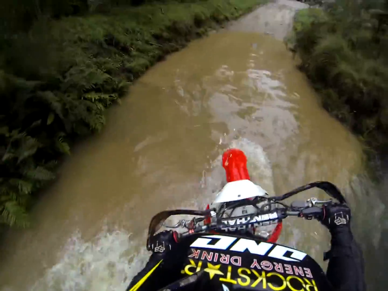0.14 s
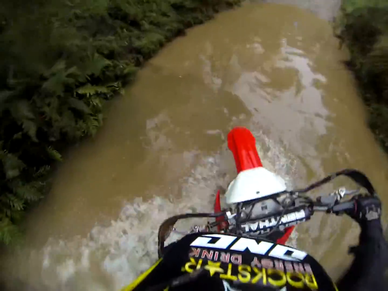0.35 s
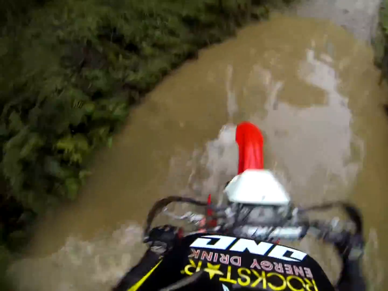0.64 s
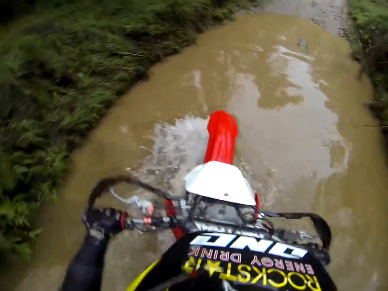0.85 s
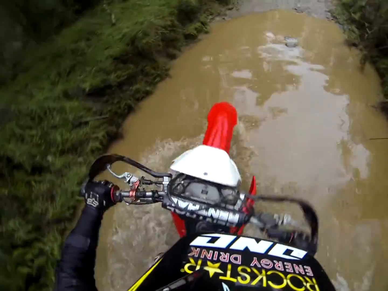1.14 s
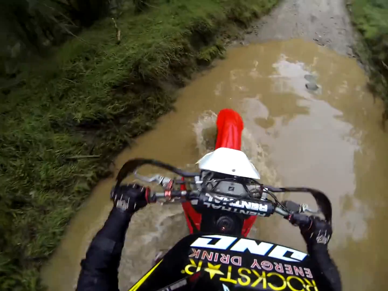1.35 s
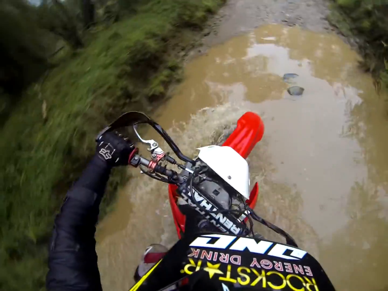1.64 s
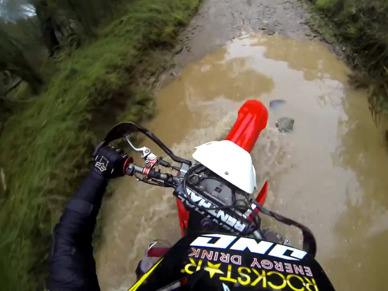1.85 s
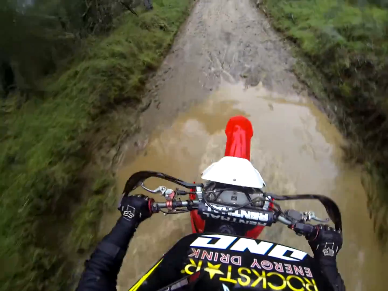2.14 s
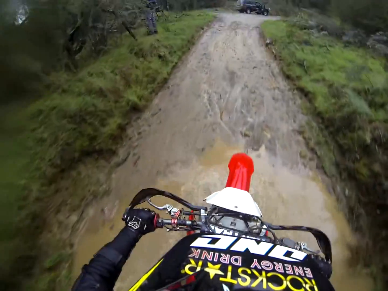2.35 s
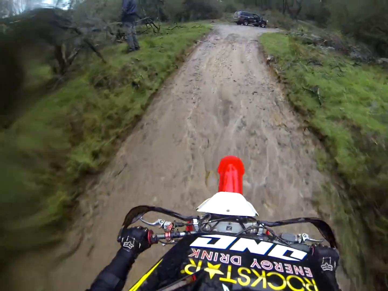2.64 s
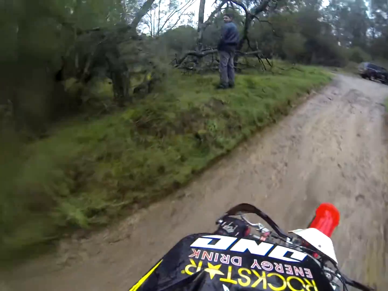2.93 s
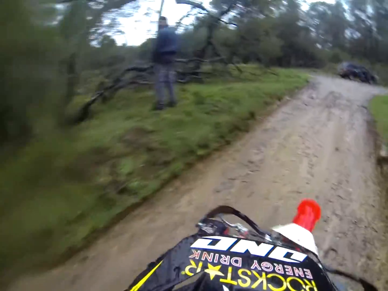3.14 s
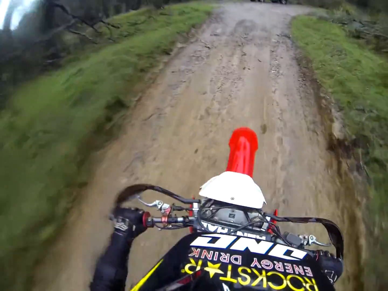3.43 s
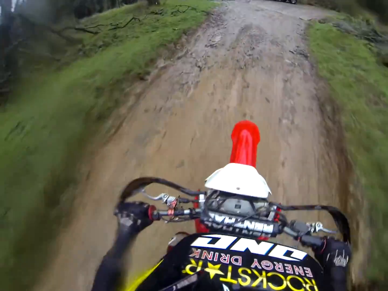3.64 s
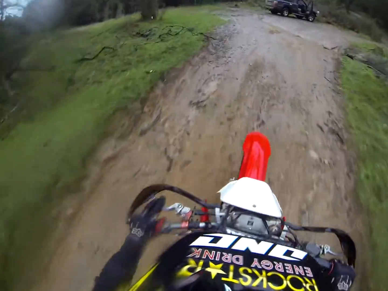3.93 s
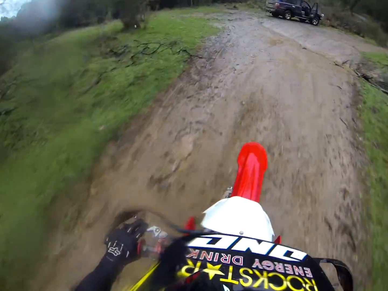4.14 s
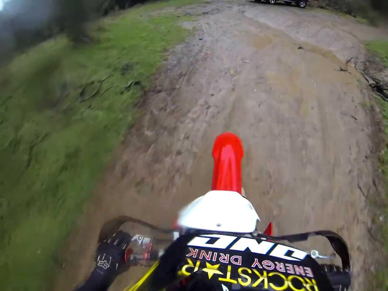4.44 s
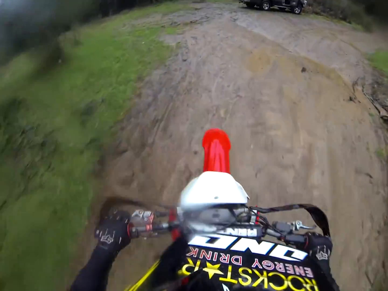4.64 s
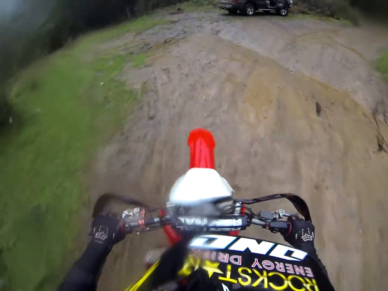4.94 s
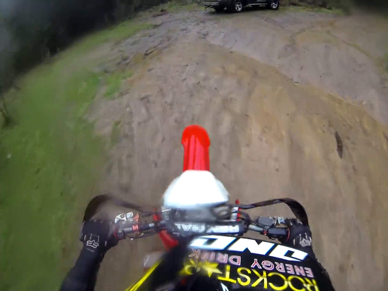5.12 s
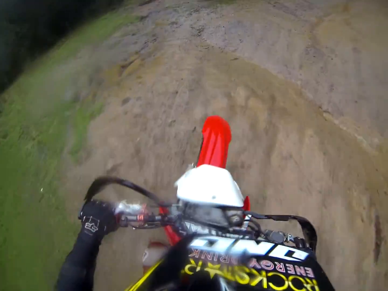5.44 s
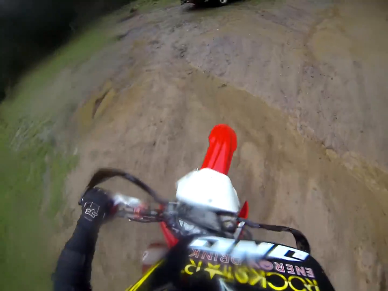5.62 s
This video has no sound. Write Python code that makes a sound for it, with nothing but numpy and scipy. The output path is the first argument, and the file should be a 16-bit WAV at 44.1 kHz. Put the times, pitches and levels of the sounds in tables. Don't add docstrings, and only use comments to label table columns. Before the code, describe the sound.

A mono, boxy, close action-camera sound: low mount flutter and wind buffeting under a buzzing dirt bike engine. It surges through splashing water, swelling and revving highest while climbing out, then drops with a big thud. On the open track it drones moderately, the throttle shuts, blips once with a hard hollow knock, and fades into slow, uneven, misfiring pulses with scattered grit clicks.

```python
import sys
import numpy as np
from scipy import signal
from scipy.fft import rfft, irfft
from scipy.io import wavfile
from scipy.ndimage import uniform_filter1d

SR = 44100
rng = np.random.default_rng(int(sys.argv[2]) if len(sys.argv) > 2 else 0)


def store_wav(level_fs):
    pcm = np.round(np.clip(np.atleast_2d(level_fs), -1, 1) * 32767)
    wavfile.write(sys.argv[1], SR, pcm.T.astype(np.int16))


def nominal_scale(level):
    x = np.asarray(level, float) / 20
    return 10 ** x


N = 254898

# time in seconds, level in dB.
LOUDNESS = [(0, -42), (.42, -37), (.55, -43), (.8, -39.5), (1.07, -30), (1.6, -35), (1.9, -29.5),
            (2.38, -23.5), (2.66, -31), (2.8, -38.5), (3.02, -35), (3.55, -34.5), (3.85, -42.5),
            (4.28, -47.5), (4.42, -39.5), (4.74, -43.5), (4.88, -46.5), (5.78, -52.5)]
# pitch in Hz, width in Hz, level in dB.
CAVITY = [(1366, 122, -7), (1567, 123, -2.5), (1630, 160, -5)]


def bike():
    # time in seconds, share from 0 to 1.
    water = [
        (0, 0.75),
        (.9, 0.9),
        (2.3, 0.72),
        (2.7, 0.48),
        (3.6, 0.34),
        (4.0, 0),
        (5.78, 0.05),
    ]
    # time in seconds, uneven burning from 0 to 1, share of missed firings from 0 to 1.
    roughness = [(0, .25, 0), (.85, .1, 0), (2.3, .06, 0), (2.65, .1, 0), (2.75, .12, 0), (3.0, .05, 0),
                 (3.6, .06, 0), (3.8, .18, .08), (4.3, .2, .1), (4.55, .1, 0), (4.75, .1, 0),
                 (4.85, .2, .12), (5.3, .12, .3), (5.78, .1, .4)]
    hz, loudness_db, flare_db, shut = controls()
    wet = np.clip(in_time(water)[0], 0, 1)
    rough, missed = in_time(roughness)
    cycle = np.cumsum(hz) / SR + 0.07 * rough * drift(25.0)
    blow_down = np.exp(-3.0 * (cycle % 1))
    valve_train = 0.6 * np.exp(-5.0 * ((cycle + 0.5) % 1))
    gate = blow_down + valve_train
    hum = crank_hum(hz, cycle, loudness_db, wet, shut)
    note = exhaust_note(hz, cycle, gate, rough, missed, loudness_db, flare_db, wet, shut)
    return hum + note + ringing_case(cycle, gate, loudness_db, wet) + whine(loudness_db)


def controls():
    # time in seconds, firings per second.
    speed = [(0, 47.5), (.39, 56.5), (.85, 60.8), (1.09, 64.5), (1.45, 61), (1.72, 67), (2.0, 67.4),
             (2.5, 80.1), (2.62, 77.5), (2.72, 62), (2.92, 51.5), (3.17, 58.7), (3.55, 61.8), (3.8, 48.3),
             (4.2, 43), (4.73, 46), (4.92, 38), (5.78, 28)]
    # time in seconds, extra firings per second, extra exhaust in dB.
    flares = [(.13, 0, 12.5), (1.0, 5.5, 5.5), (1.21, 7.5, -1), (1.42, 0, 2), (1.54, 0, 1),
              (1.68, 0.5, -5.5), (2.06, 0, -6.5), (2.27, -1.75, -12), (2.4, 1, -7), (3.02, -1, 4),
              (3.5, 0, -2.5), (3.87, 0, 3.5), (4.12, 0.5, 4.), (4.34, 0, 3.5), (4.43, 8.5, -3.),
              (4.7, 0, 5.5), (4.87, 0, -7), (5.05, 0, 3.5), (5.42, -0.5, -5.5)]
    # opens in seconds, shuts in seconds.
    throttle_open = [
        (-.1, 3.51),
        (4.3, 4.63),
    ]
    opening_s, shutting_s = 0.022, 0.14
    flare_hz, flare_db = swells(flares)
    opens, shuts = np.array(throttle_open).T[:, :, None]
    t = np.arange(N) / SR
    opened = np.minimum((t - opens) / opening_s, 1 - (t - shuts) / shutting_s)
    shut = 1 - np.clip(opened, 0, 1).max(axis=0)
    return in_time(speed)[0] + flare_hz, in_time(LOUDNESS)[0], flare_db, shut


def crank_hum(hz, cycle, loudness_db, wet, shut):
    # time in seconds, level in dB.
    shake = [(0, -31.5), (.25, -30), (.8, -32), (1.0, -17.5), (1.1, -18.5), (1.38, -24.5), (1.52, -24.5),
             (1.95, -27.5), (2.25, -33), (2.42, -26), (2.62, -31.5), (2.9, -38), (3.17, -30), (3.45, -42),
             (3.68, -32.5), (4.2, -46.5), (4.46, -30), (4.7, -41.5)]
    # pitch in Hz, gain in dB.
    frame = [(85, -2.5), (105, 4.), (125, -0.5), (143, -5), (167, 0), (200, 2.5), (222, 5.5), (240, 16.5)]
    above_db = loudness_db + 40
    first_db = -38.0 + 0.73 * above_db - 10.5 * wet - 14 * shut
    first = nominal_scale(first_db) * np.sin(2 * np.pi * cycle)
    second_db = in_time(shake)[0] + 1.0 * drift(1.4)
    second = nominal_scale(second_db) * np.sin(4 * np.pi * cycle)
    frame_hz, frame_db = np.transpose(frame)
    third_db = -48 + 13 * shut + 0.48 * above_db
    third_db = third_db + np.interp(3 * hz, frame_hz, frame_db)
    third = nominal_scale(third_db - 1.5 + 1.0 * drift(9.7)) * np.sin(6 * np.pi * cycle)
    return np.sqrt(2) * (first + second + third)


def exhaust_note(hz, cycle, gate, rough, missed, loudness_db, flare_db, wet, shut):
    # pitch in Hz, width in Hz, level in dB.
    pipe_modes = [(66, 25, -2), (118, 51, 3.5), (232.2, 28.8, 5.5), (323.4, 27.9, -1)]
    # pitch in Hz, width in Hz, level in dB.
    bark_modes = [(470, 98, -4), (558, 53, -3.5), (699, 55, -6.5), (977, 55, -11.5)]
    # time in seconds, pitch in Hz, boost in dB.
    favoured_pitch = [(0, 477, -1), (.4, 413, 16), (1.1, 486, -4.5), (1.45, 420, 12), (1.55, 694, 8.),
                      (1.7, 730, 10), (1.8, 540, 1), (2.19, 420, 5), (2.45, 520, 8.5), (3.1, 474, 6),
                      (3.57, 533, 9), (5.78, 470, 1)]
    favoured = in_time(favoured_pitch)
    pipe_db = loudness_db + 9.5 - 15.0 * wet + flare_db
    bark_db = loudness_db - 1.5 - 3.5 * wet + 0.31 * flare_db
    bark_db = bark_db + shut * (-8.5 + 20 * np.log2(hz / 48))

    chance = np.c_[rng.standard_normal(400), rng.random(400)][cycle.astype(int)]
    strength = nominal_scale(8.0 * rough * chance[:, 0] - 13.0 * (chance[:, 1] < missed))
    strength = cut(strength, 300, "low", order=2)
    gas = rms_one(gate * rng.standard_normal(N))

    low_lines = orders(hz, cycle, pipe_modes, *favoured, multiples=range(4, 14))
    pipe = gas_and_lines(low_lines, gas, strength, rough, pipe_modes, [170, 380])
    high_lines = orders(hz, cycle, bark_modes, *favoured, multiples=range(4, 25))
    bark = gas_and_lines(high_lines, gas, strength, rough, bark_modes, [400, 900])
    return nominal_scale(pipe_db - 2.0) * pipe + nominal_scale(bark_db + 1.0) * cut(bark, 177, "high", order=2)


def orders(hz, cycle, modes, loudest_hz, boost_db, multiples):
    grid = np.arange(1, 2001.0)
    response = np.zeros(len(grid), complex)
    for k, (top_hz, width_hz, db) in enumerate(modes):
        response += (-1) ** k * nominal_scale(db) / (1 + 2j * (grid - top_hz) / width_hz)
    out = np.zeros(N)
    for k in multiples:
        colour = response[np.minimum(k * hz, len(grid) - 1).astype(int)]
        favoured_db = boost_db * np.exp(-((k * hz - loudest_hz) / 45) ** 2)
        line = np.real(colour * np.exp(2j * np.pi * k * cycle))
        out += nominal_scale(favoured_db + 3.3 * drift(2.5)) * line
    return rms_one(out)


def gas_and_lines(lines, gas, strength, rough, modes, band_hz):
    note = strength * (lines + 1.6 * rough * rms_one(resonate(gas, modes)))
    inside = cut(note, band_hz, "band", order=3)
    return note / np.sqrt(uniform_filter1d(inside ** 2, size=SR // 8))


def ringing_case(cycle, gate, loudness_db, wet):
    # pitch in Hz, width in Hz, level in dB.
    shell_modes = [(2079, 69, 8), (2475, 192, 2), (3000, 490, 0.5), (3574, 277, 1.5), (3842, 180, 2.5)]
    # pitch in Hz, width in Hz, level in dB.
    top_modes = [(4845, 790, 15.5), (5350, 280, -6.5), (7100, 470, 1), (9000, 9600, -29), (11200, 7200, -1),
                 (14000, 310, -32)]
    # time in seconds, change in dB.
    slaps = [(.06, 0), (.73, 0), (1.2, -0.5), (1.31, 1.5), (1.54, 4.5), (1.99, 1), (2.19, 1.5), (2.28, 3.5),
             (2.49, 1.5), (2.67, 2), (3.85, -1.5), (4.13, 2.5), (4.6, -2)]
    cavity_db = -33.0 + 0.75 * (loudness_db + 40) + swells(slaps)[0]
    taps = rms_one(np.diff(np.floor(cycle), prepend=0))
    clatter = rms_one((0.5 + gate) * rng.standard_normal(N))
    metal = rms_one(0.12 * taps + clatter)
    hiss = np.sqrt(1 - wet) * metal + np.sqrt(wet) * spray(per_s=4000.0)
    hiss = nominal_scale(0.5 * drift(4.8)) * hiss

    cavity = resonate(resonate(hiss, CAVITY, wander_db=1.5), [(1492, 780, 0.0)])
    cavity = evened(cavity, window_s=0.13)
    shell = cut(resonate(hiss, shell_modes, wander_db=1.5), [1500, 4300], "band", order=3)
    shell = evened(shell, window_s=0.1)
    top = cut(resonate(hiss, top_modes), 2200, "high", order=2)
    top = evened(cut(top, 7000, "low", order=2), window_s=0.17)
    return nominal_scale(cavity_db) * cavity + nominal_scale(loudness_db) * (shell + nominal_scale(-13.0) * top)


def spray(per_s):
    sizes = nominal_scale(5.4 * np.minimum(rng.exponential(1, N), 5)) * rng.choice([-1, 1], N)
    drops = sizes * (rng.random(N) < per_s * nominal_scale(4.0 * drift(15.0)) / SR)
    return rms_one(rms_one(drops) + 1.8 * rng.standard_normal(N))


def whine(loudness_db):
    # time in seconds, pitch in Hz, dB against the loudness.
    gear_mesh = [(0, 7500, -19), (.42, 7420, -11.5), (.75, 7450, -19), (1.03, 7390, -28), (1.37, 7800, -20),
                 (1.75, 7350, -26), (2.64, 7370, -19.5), (3.5, 7410, -15.5), (3.75, 7420, -32)]
    hz, against_db = in_time(gear_mesh)
    level_db = loudness_db + against_db
    wobble = cut(rng.standard_normal((2, N)), 210, "low", order=2)
    turn = 2 * np.pi * np.cumsum(hz) / SR
    teeth = rms_one(wobble[0] * np.cos(turn) + wobble[1] * np.sin(turn))
    mesh = nominal_scale(level_db - 5.5 + 2.0 * drift(30.0)) * teeth
    thin_mode = [(10250, 300, 0)]
    thin = resonate(resonate(rng.standard_normal(N), thin_mode), thin_mode)
    return mesh + nominal_scale(-84) * rms_one(thin)


def grit():
    # time in seconds, peak in dB, lower ring in dB
    ticks = [(0.1281, -48, -1), (0.4958, -51, -2), (0.7317, -55, 1), (1.4287, -51, 8), (2.9996, -47, 3),
             (3.2999, -52, 10), (3.3348, -48, 4), (3.4825, -49, 6), (3.491, -44, 2), (3.5528, -52, 10),
             (3.5728, -49, 3), (3.6117, -49, 1), (3.7324, -51, 2), (3.9165, -52, 1), (4.1719, -57, 2),
             (4.2557, -56, -2), (4.3141, -47, -6), (4.373, -54, 5), (4.6049, -54, 2), (4.6897, -52, 1),
             (4.7456, -55, 2), (4.8564, -47, 5), (4.9711, -58, 1), (5.0464, -59, 13), (5.0983, -52, -6),
             (5.2914, -54, -1), (5.474, -57, 0), (5.5702, -55, -5), (5.6082, -58, -2),
             (5.7785, -43, -12),
    ]
    # time in seconds, peak in dB.
    knocks = [
        (0.633, -33),
        (4.4079, -18),
        (4.8219, -25),
        (5.3961, -28),
    ]
    crack_modes = [(6200, 700, 5), (8000, 1500, 1), (10500, 2500, -2), (13000, 2500, -8)]  # Hz, width Hz, dB
    table = np.array(ticks)
    sand = nominal_scale(-48 + 4.0 * np.minimum(rng.exponential(1, N), 3)) * (rng.random(N) < 25.0 / SR)
    crack = resonate(clicks(table, nominal_scale(table[:, 1] + 19)) + sand, crack_modes)
    ring_hits = clicks(table, nominal_scale(table[:, 1] + table[:, 2] + 39))
    ring = resonate(ring_hits, [(4900, 250, 0.0), (3700, 500, -17)])
    knock_hits = clicks(knocks, nominal_scale(np.array(knocks)[:, 1] + 43))
    knock = resonate(cut(knock_hits, 2200, "low", order=4), CAVITY)
    return crack + ring + knock


def mount():
    # time in seconds, pitch in Hz.
    sway_pitch = [(0, 21.5), (.9, 21.5), (1.2, 23.5), (1.8, 23.5), (2.05, 21), (3.1, 23.1), (3.7, 19.6),
                  (4.55, 19), (4.9, 15.5), (5.2, 19), (5.78, 20)]
    hz, = in_time(sway_pitch)
    swing = np.sqrt(2) * np.sin(2 * np.pi * np.cumsum(hz) / SR)
    loose = 0.3 * rms_one(cut(drift(4.5), 6.3, "high", order=2))
    return nominal_scale(swaying() - 1.0) * (swing + loose) + buffeting() + thuds()


def swaying():
    # time in seconds, level in dB.
    bumps = [(.13, -12), (.33, -14.5), (.51, -10), (.74, -12.5), (.92, -22), (1.16, -14.5), (1.37, -14.5),
             (1.48, -17.5), (1.6, -13.5), (1.7, -21), (1.8, -14.5), (2.04, -13), (2.23, -14), (2.52, -18.5),
             (2.69, -12.5), (2.88, -14.5), (3.1, -25), (3.32, -14.5), (3.64, -12.5), (3.86, -17),
             (4.059, -12), (4.318, -20.5), (4.56, -13.5), (4.76, -13.5), (5.04, -21.5), (5.15, -14.5),
             (5.36, -18), (5.489, -12.5), (5.79, -22.5)]
    rise_db_per_s, fall_db_per_s = 106, 89
    t = since(bumps)
    level_db = np.array(bumps)[:, 1:] + np.minimum(rise_db_per_s * t, -fall_db_per_s * t)
    return 10 * np.log10(np.sum(nominal_scale(2 * level_db), axis=0))


def thuds():
    # time in seconds, peak in dB.
    jolts = [
        (0.12, -6),
        (0.429, -11.5),
        (0.499, -10),
        (0.738, -13.5),
        (1.16, -32.5),
        (1.559, -38),
        (1.996, -38),
        (2.199, -11),
        (2.669, -7.5),
    ]
    push = cut(clicks(jolts, nominal_scale(np.array(jolts)[:, 1] + 39.0)), 110, "low", order=2)
    return resonate(push, [(27.5, 52, 4.0), (62.4, 4.1, 6.0), (114, 27, -23), (214, 41, -48)])


def buffeting():
    # pitch in Hz, level in dB per Hz.
    air_tone = [(18, -11), (30, -0.5), (138, -24.5), (299, -30.5), (420, -36), (521, -31), (1060, -42),
                (1200, -34.5), (1560, -76), (2640, -120)]
    # time in seconds, change in dB.
    gusts = [(.4, 1), (.69, -4.), (1.1, 1.5), (1.38, 3), (1.55, 4), (1.68, 3), (2.03, 7), (2.33, -10),
             (2.5, -7.), (2.9, -11.), (3.1, 3.), (3.44, 3.5), (4.07, 3.5), (4.4, -5.5), (4.64, -3),
             (4.8, 2)]
    level_db = -32.5 + 0.27 * (in_time(LOUDNESS)[0] + ducking() + 40) + swells(gusts)[0]
    tone_hz, tone_db = np.transpose(air_tone)
    bins_hz = np.maximum(np.fft.rfftfreq(N, 1 / SR), 1)
    shape = nominal_scale(np.interp(np.log(bins_hz), np.log(tone_hz), tone_db))
    air = rms_one(irfft(rfft(rng.standard_normal(N)) * shape, N))
    return nominal_scale(level_db + 3.0 + 0.98 * drift(11.5)) * air


def ducking():
    # time in seconds, depth in dB.
    ducks = [
        (-.02, 8.5),
        (0.143, 18.5),
        (0.513, 17.5),
        (0.753, 12),
        (1.17, 3.),
        (1.634, 5.5),
        (2.011, 9),
        (2.204, 11.5),
        (2.672, 15),
    ]
    drop_s, recovery_s = 0.02, 0.15
    t = np.maximum(since(ducks), 0)
    drops_db = np.array(ducks)[:, 1:] * np.minimum(t / drop_s, 1) * np.exp(-t / recovery_s)
    return -np.sum(drops_db, axis=0)


def rms_one(x):
    return x / np.sqrt(np.mean(x ** 2) + 1e-20)


def evened(x, window_s):
    return x / np.sqrt(uniform_filter1d(x ** 2, size=int(window_s * SR)) + 1e-12)


def cut(x, hz, kind, order):
    return signal.sosfilt(signal.butter(order, hz, kind, fs=SR, output="sos"), x)


def resonate(x, modes, wander_db=0):
    out = np.zeros(N)
    for k, (hz, width_hz, db) in enumerate(modes):
        r = np.exp(-np.pi * width_hz / SR)
        poles = [1, -2 * r * np.cos(2 * np.pi * hz / SR), r * r]
        zeros = [(1 - r * r) / 2, 0, (r * r - 1) / 2]
        gain = nominal_scale(db + wander_db * drift(2.3)) if wander_db else nominal_scale(db)
        out += (-1) ** k * gain * signal.lfilter(zeros, poles, x + 1e-18)
    return out


def drift(rate):
    r = np.exp(-80 * np.pi * rate / SR)
    slow = signal.lfilter([1], [1, -2 * r, r * r], rng.standard_normal(N // 40 + 2002))[2000:]
    return np.interp(np.arange(N) / 40, np.arange(len(slow)), rms_one(slow))


def in_time(rows):
    s, *columns = np.transpose(rows)
    return [np.interp(np.arange(N) / SR, s, c) for c in columns]


def since(rows):
    return np.arange(N) / SR - np.array(rows)[:, :1]


def swells(rows):
    width_s = 0.07
    return np.array(rows)[:, 1:].T @ np.exp(-(since(rows) / width_s) ** 2)


def clicks(rows, heights):
    out, table = np.zeros(N), np.array(rows)
    out[np.minimum((table[:, 0] * SR).astype(int), N - 1)] = heights
    return out


def scene():
    ducked_bike = nominal_scale(ducking()) * bike()
    return (ducked_bike + grit() + mount())[None]


def top_cut(x):
    return signal.sosfilt(signal.butter(12, 15150, fs=SR, output="sos"), x)


def record(dry):
    hissy = dry + nominal_scale(-66.5) * cut(rng.standard_normal(dry.shape), 8600, "low", order=4)
    rounded = 1.5 * np.tanh(hissy / 1.5)
    return top_cut(rounded)


dry = scene()
out = record(dry)
store_wav(out)
```